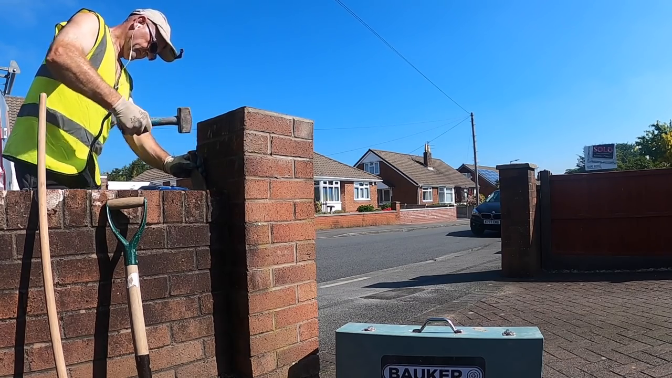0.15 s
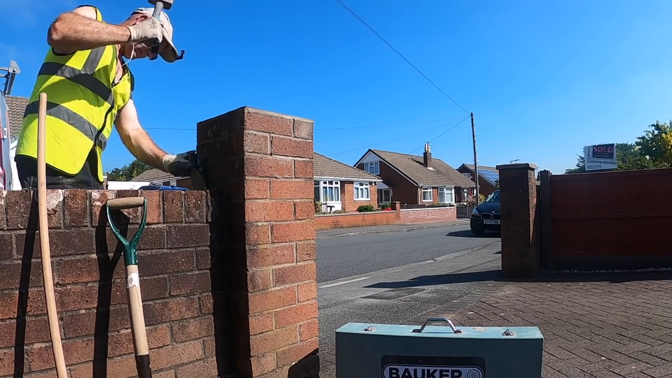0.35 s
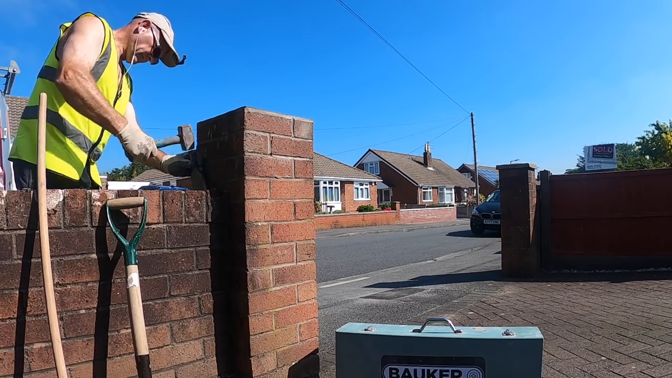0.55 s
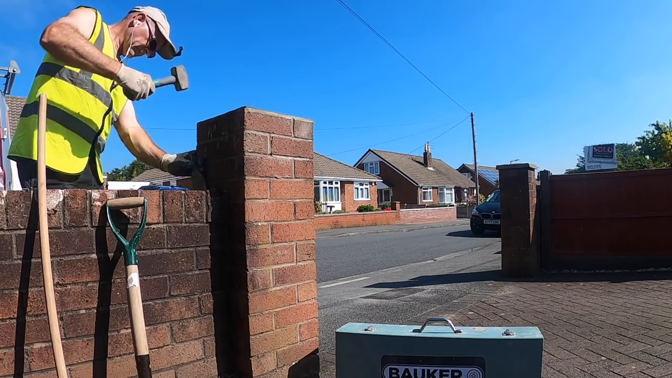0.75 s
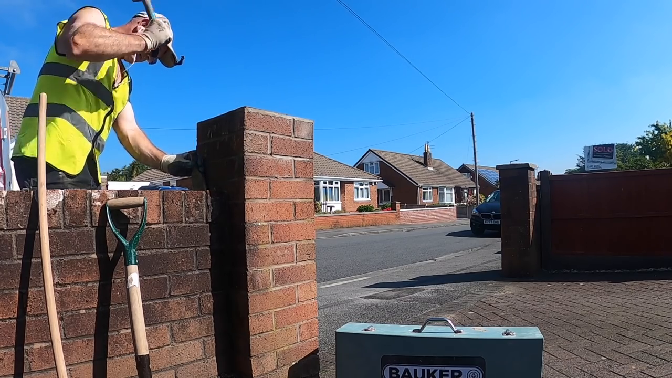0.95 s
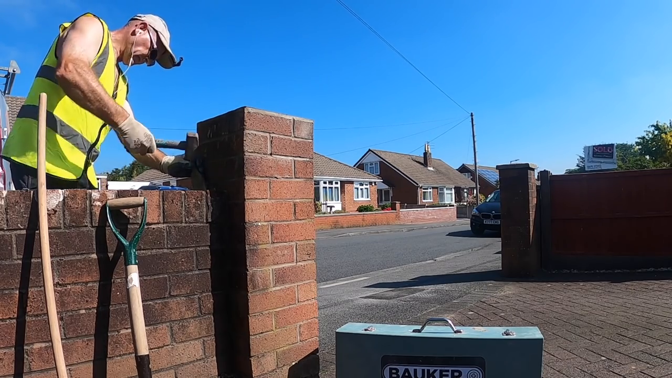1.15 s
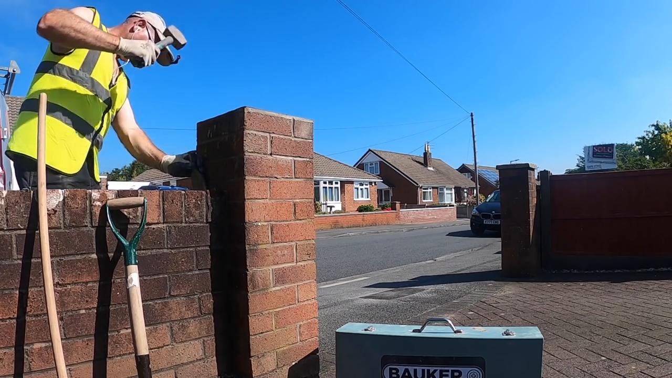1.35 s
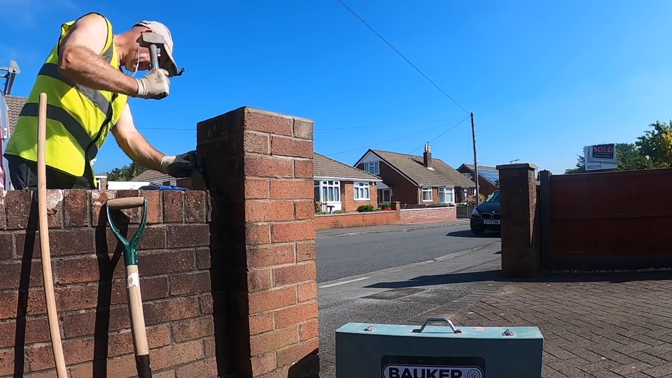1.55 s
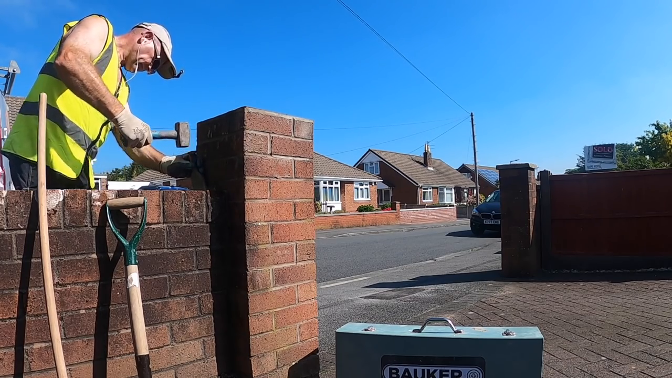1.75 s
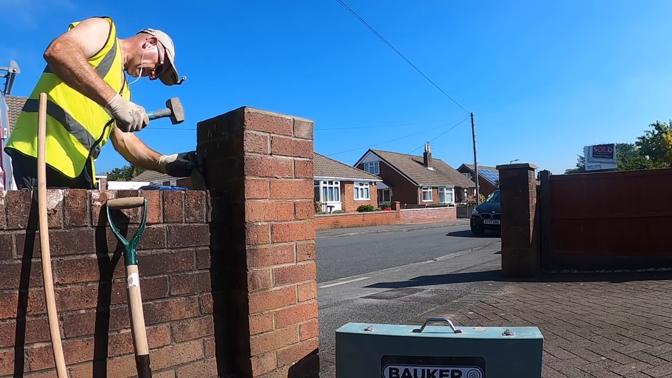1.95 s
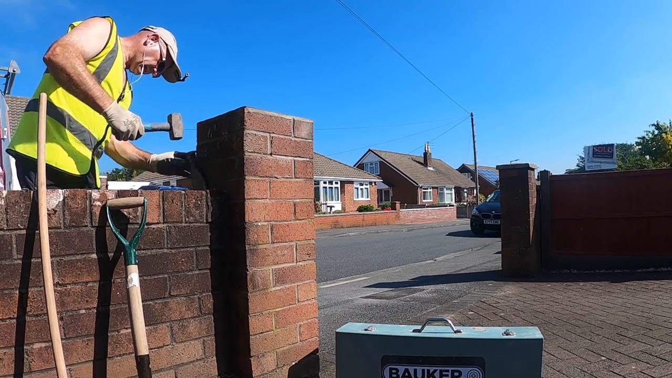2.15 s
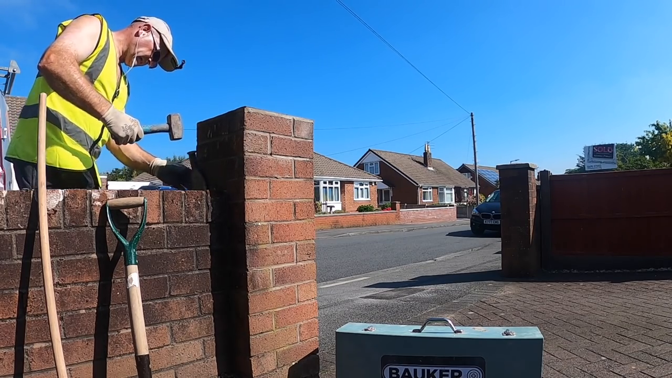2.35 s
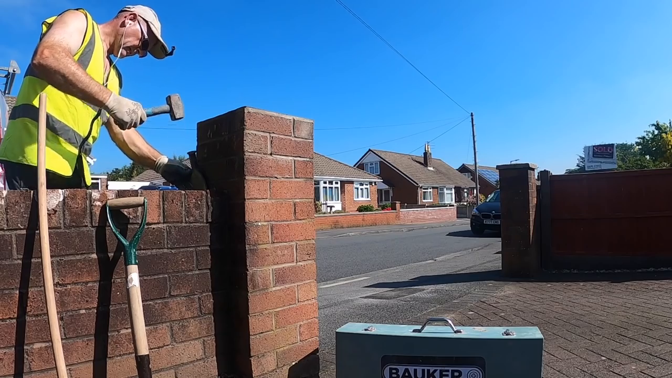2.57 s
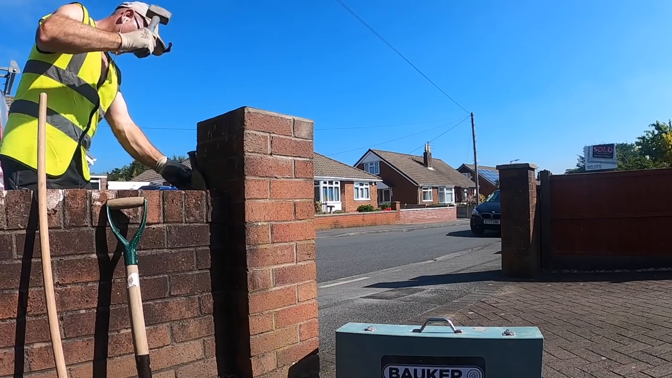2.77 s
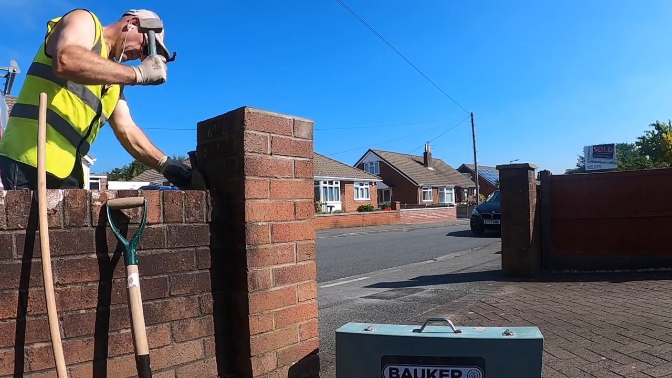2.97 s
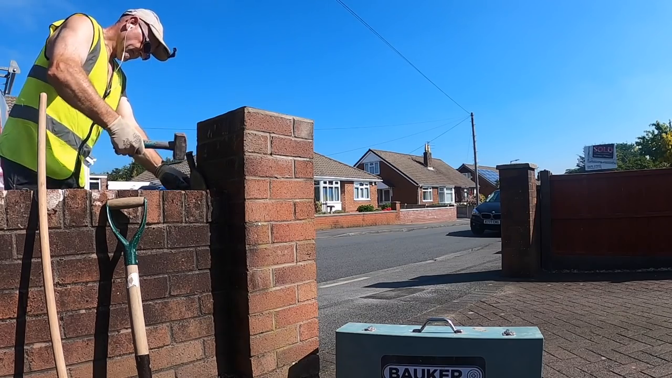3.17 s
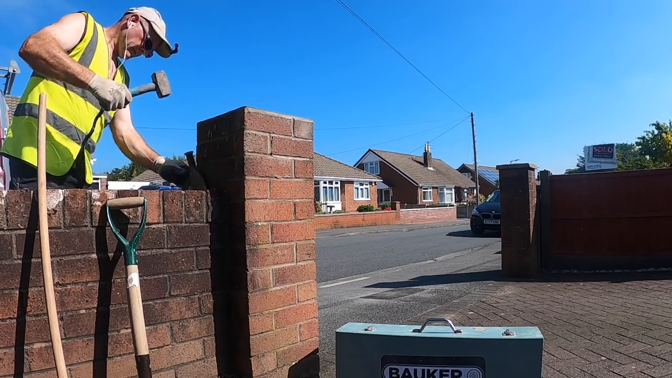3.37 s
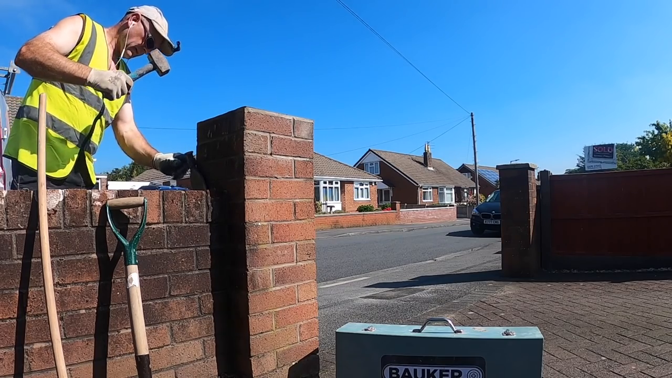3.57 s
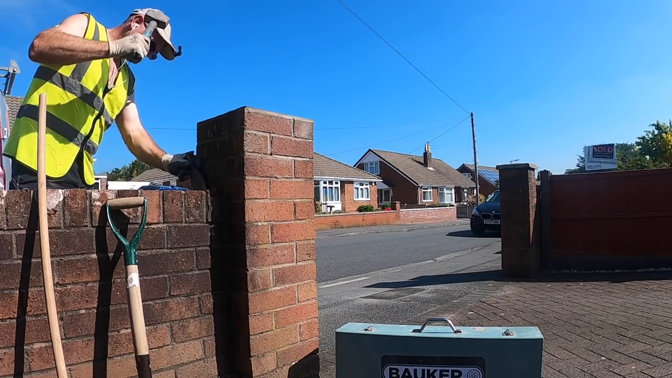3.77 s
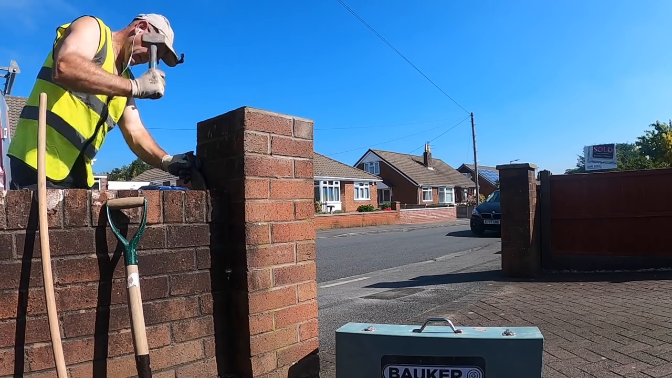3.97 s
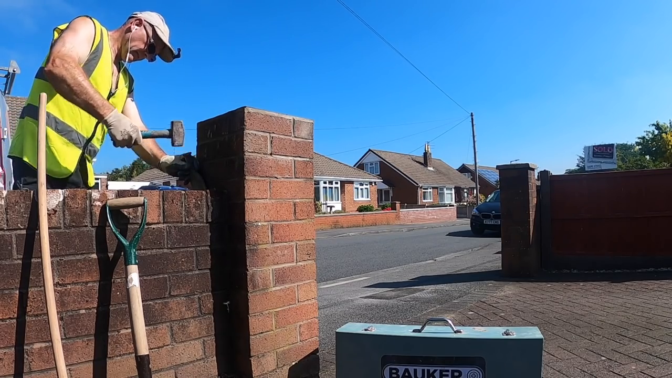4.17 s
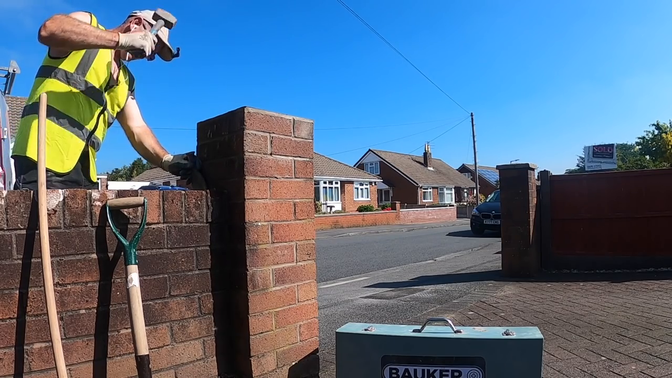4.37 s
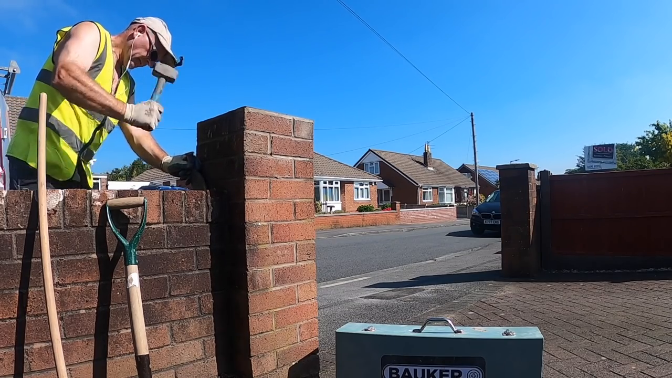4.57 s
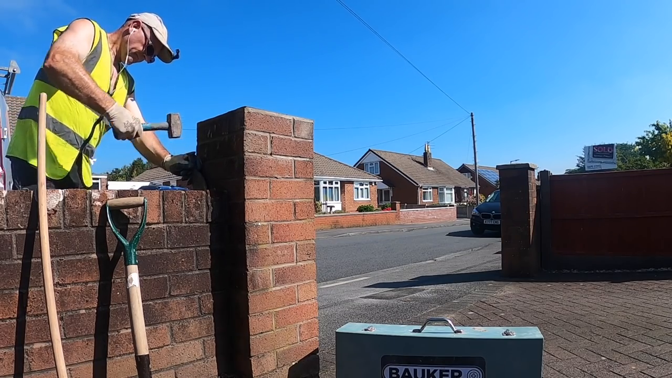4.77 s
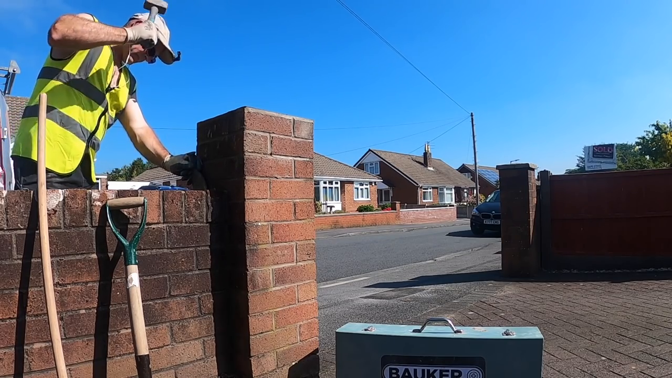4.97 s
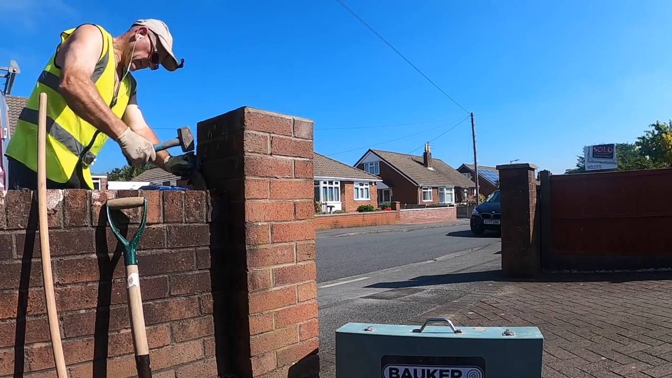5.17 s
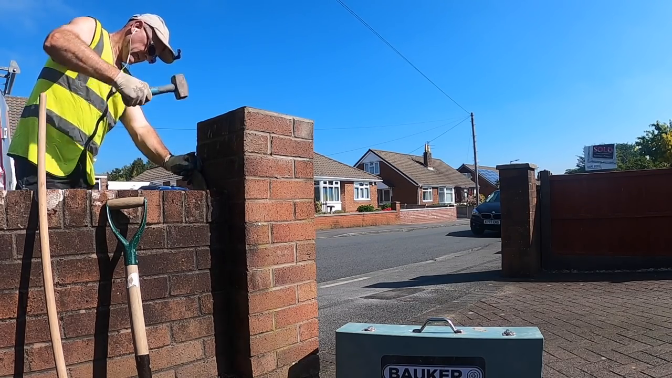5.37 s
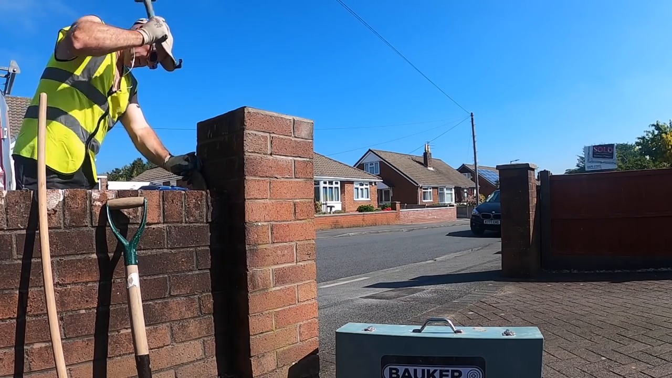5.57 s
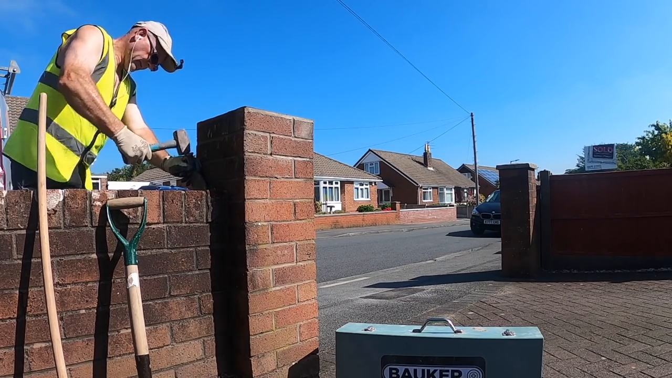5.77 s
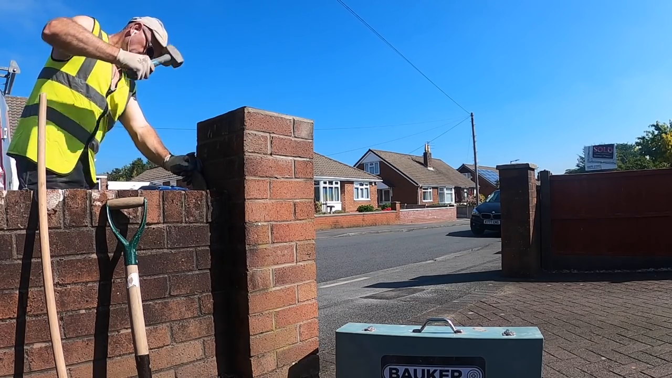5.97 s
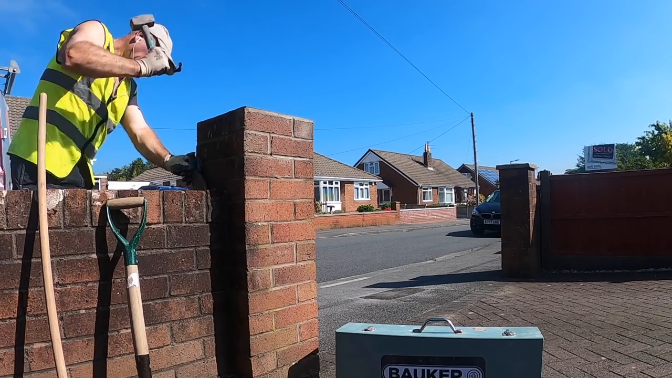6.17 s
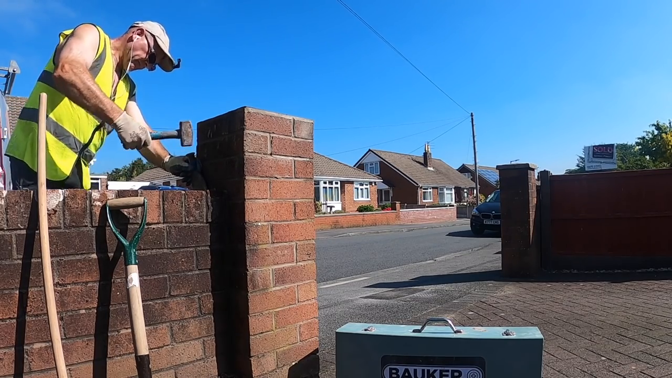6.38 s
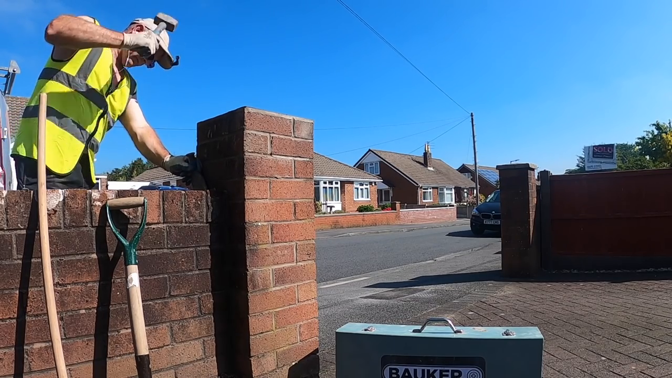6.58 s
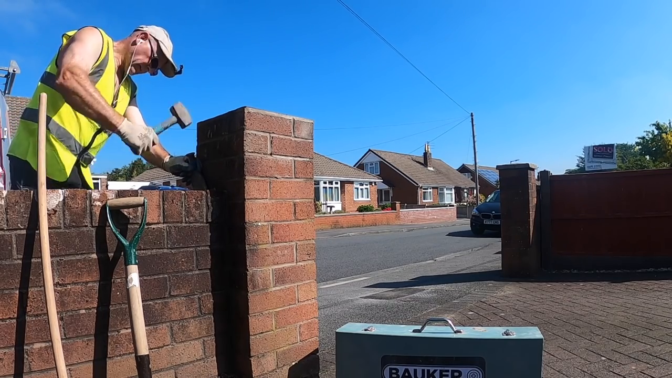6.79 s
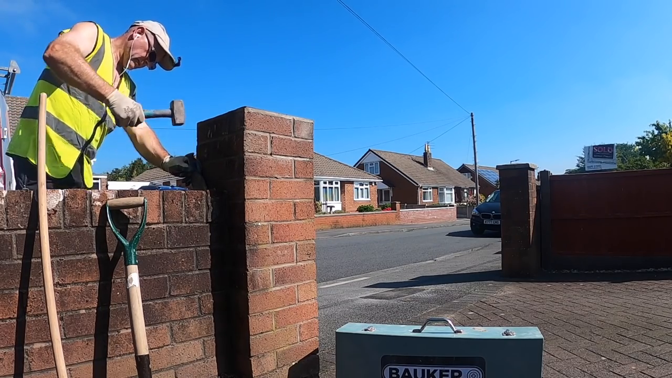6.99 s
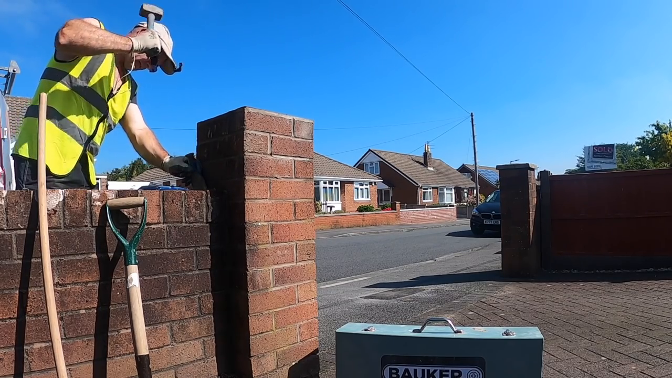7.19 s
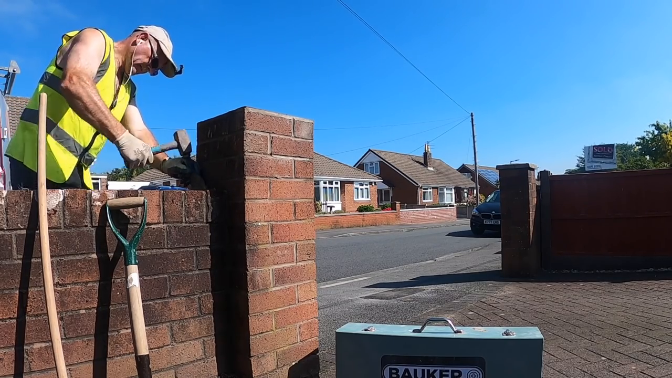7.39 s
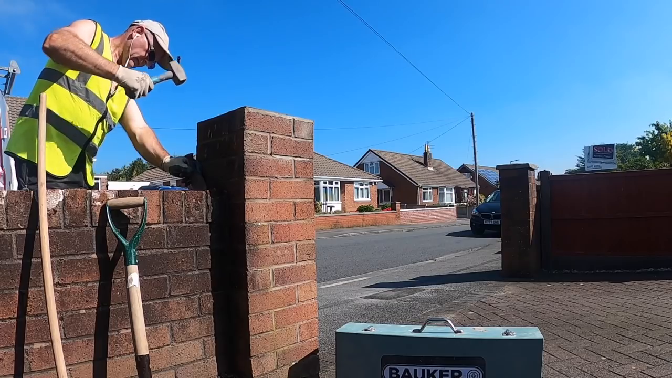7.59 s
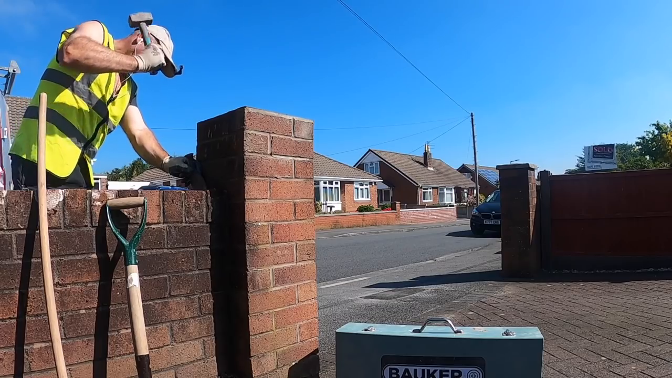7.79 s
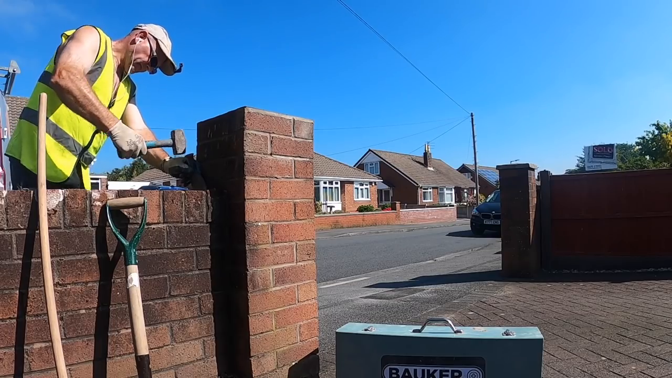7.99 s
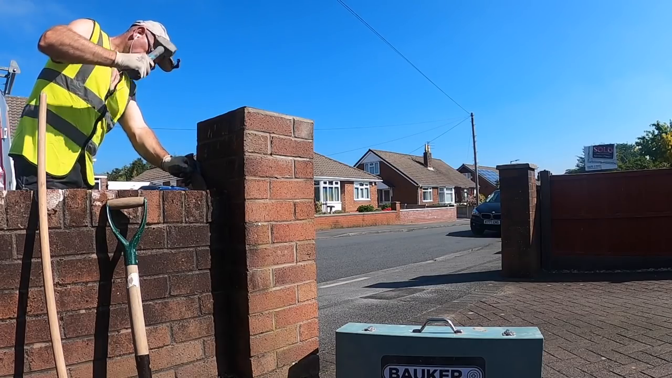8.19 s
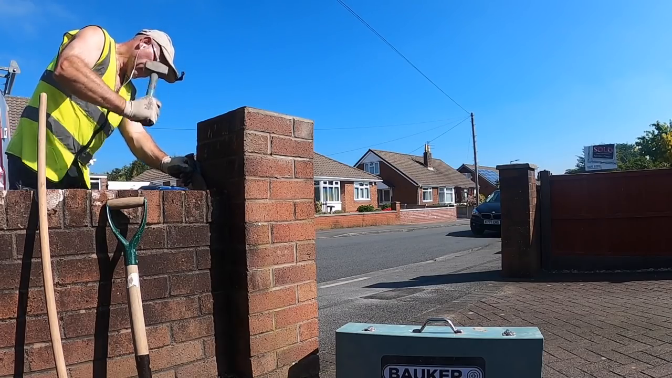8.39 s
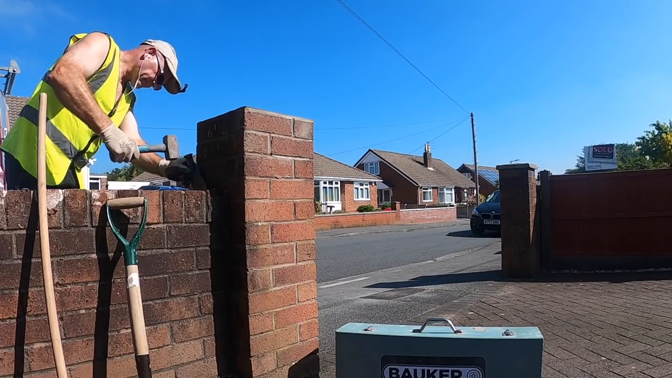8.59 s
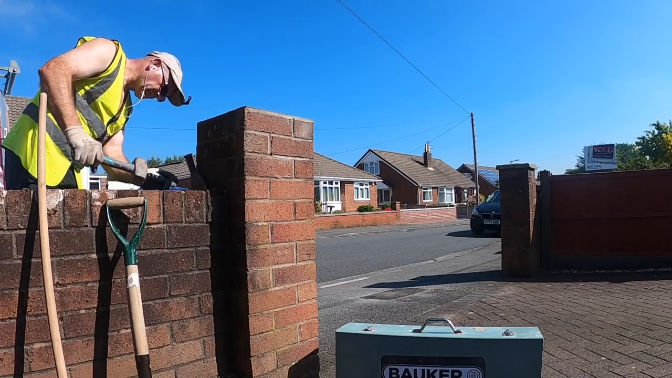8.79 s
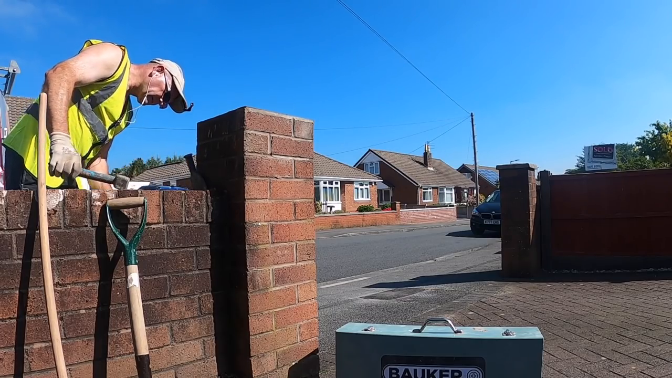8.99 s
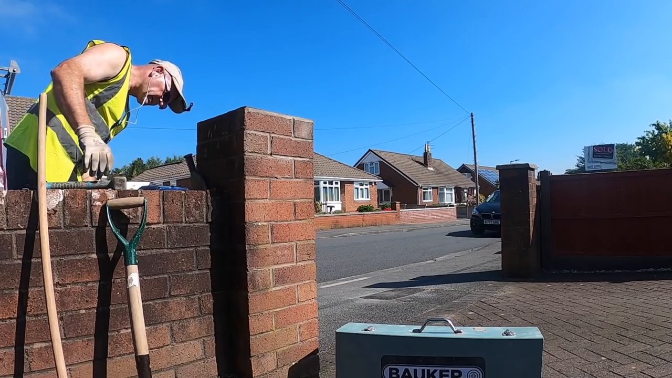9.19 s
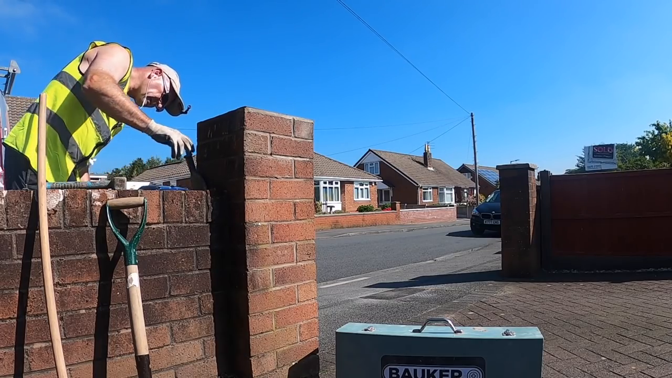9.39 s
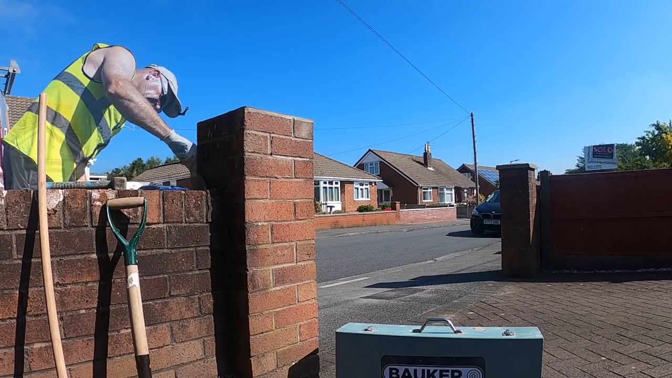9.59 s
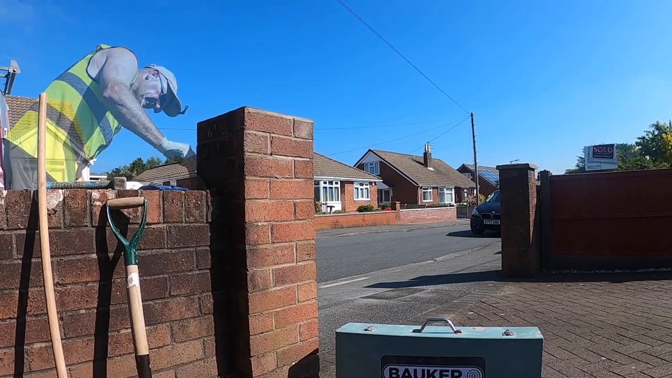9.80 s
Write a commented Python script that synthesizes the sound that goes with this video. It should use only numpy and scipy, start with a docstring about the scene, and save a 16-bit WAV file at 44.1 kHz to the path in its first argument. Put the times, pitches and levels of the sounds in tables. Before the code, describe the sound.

A club hammer cracks hard on a steel chisel in a brick pillar, fourteen sharp steady blows echoing off houses, then tools clatter down.

```python
"""A bird chirp over faint far traffic, then at once the first of fourteen blows of a club hammer on a steel
chisel in a brick pillar: filtered noise bursts with wall echoes, each after a stepped rise of bright noise.
Some blows rebound; between them crushed grains scrape in the joint. Near the end chips settle and the tools
knock down on the wall, with decaying sines. Wind rumbles low. Mono, hard-limited."""
import sys
import numpy as np
from scipy import signal
from scipy.fft import rfft, irfft
from scipy.io import wavfile
from scipy.ndimage import map_coordinates

SR = 44100
rng = np.random.default_rng(int(sys.argv[2]) if len(sys.argv) > 2 else 0)


def store_wav(level_fs):
    """Save 16-bit WAV to argv[1]."""
    pcm = np.round(np.clip(np.atleast_2d(level_fs), -1, 1) * 32767)
    wavfile.write(sys.argv[1], SR, pcm.T.astype(np.int16))


N = 434385


def amp(db):
    """Decibels to gain."""
    return 10 ** (np.asarray(db) / 20)


def unit(x):
    """Scaled to rms 1."""
    return x / np.sqrt(np.mean(x ** 2) + 1e-20)


def shape(points, f_hz):
    """Gain interpolated through (f/Hz, level/dB) points on a log frequency axis."""
    knots_hz, level_db = np.transpose(points)
    return amp(np.interp(np.log(f_hz + 1), np.log(knots_hz), level_db))


def resonance(f_hz, centre_hz, width_hz):
    """Gain of one damped mode."""
    return 1 / np.sqrt(1 + ((f_hz ** 2 - centre_hz ** 2) / (f_hz * width_hz + 1e-6)) ** 2)


def colour(x, gain):
    """x through a minimum-phase filter of unit energy with the given gain of frequency."""
    size = 8192
    cepstrum = irfft(np.log(np.maximum(gain(np.fft.rfftfreq(size, 1 / SR)), 1e-6)))
    # fold the cepstrum to make the pulse causal
    cepstrum[1:size // 2] *= 2
    cepstrum[size // 2 + 1:] = 0
    pulse = irfft(np.exp(rfft(cepstrum)))
    return signal.fftconvolve(x, pulse / np.linalg.norm(pulse))[:len(x)]


def fade(t_s, t60_s):
    """Exponential decay, 60 dB in t60_s."""
    return np.exp(-np.log(1000) * t_s / t60_s)


def wobble(rate_hz):
    """A smooth random curve, rate_hz knots a second."""
    knots = rng.standard_normal(int(N * rate_hz / SR) + 4)
    return map_coordinates(knots, [np.arange(N) * rate_hz / SR])


def swell(peak_s, length_s):
    """A smooth rise and fall of height 1 around peak_s."""
    return np.exp(-((np.arange(N) / SR - peak_s) / length_s) ** 2)


def add(track, s, sound):
    """Mix a sound in at time s."""
    start = max(round(s * SR), 0)
    track[start:start + len(sound)] += sound[:max(N - start, 0)]


# wind rumble spectrum: f/Hz, relative level/dB
RUMBLE_SPECTRUM = [(15, -19.5), (35, -13.5), (55, 6), (90, 4), (200, -15), (800, -68)]
CALM_DB, GUST_DB, GUST_S, GUST_LENGTH_S = -61.5, 11, 2.62, .45


def breeze():
    """Light air rumbles on the microphone, with one gust: low noise of wavering level."""
    level_db = CALM_DB + GUST_DB * swell(GUST_S, GUST_LENGTH_S)
    rumble = unit(colour(rng.standard_normal(N), lambda f_hz: shape(RUMBLE_SPECTRUM, f_hz)))
    return amp(level_db + 2.7 * wobble(4.4)) * rumble


# far-road spectrum: f/Hz, relative level/dB
TRAFFIC_SPECTRUM = [(20, -44), (50, -19), (130, -10), (190, -3), (290, -14), (450, -15), (700, -15),
                    (1050, -13.5), (1700, -18.5), (3000, -27), (5300, -30), (7500, -43.5), (11000, -56),
                    (14000, -70.5)]
# far vehicles: loudest t/s, length/s, swell above the wash/dB
VEHICLE_PASSES = [(0.203, 0.95, 2), (3.4, 1, 6.5), (9.85, 1, 4.5)]
TRAFFIC_DB = -49


def traffic():
    """A slowly wavering noise wash of far roads that swells as vehicles pass."""
    level_db = TRAFFIC_DB + sum(db * swell(s, length_s) for s, length_s, db in VEHICLE_PASSES)
    wash = unit(colour(rng.standard_normal(N), lambda f_hz: shape(TRAFFIC_SPECTRUM, f_hz)))
    return amp(level_db + 0.46 * wobble(5.1)) * wash


# bird chirps: t/s, start f/Hz, level/dB
BIRD_CHIRPS = [(.015, 6260, -42), (0.594, 4880, -44), (1.565, 4800, -41), (2.685, 4500, -44),
               (2.995, 5140, -50), (3.65, 5100, -51), (3.86, 3380, -47), (3.97, 5300, -58),
               (4.605, 5100, -51)]
BIRD_HOME_HZ, BIRD_MAX_SLUR_HZ = 5850, 970  # chirps slide towards home, by at most the slur
SYRINX_RATIO, SYRINX_SHARE = 1.19, .7  # second voice: pitch ratio, amplitude ratio


def birds(length_s=.035, waver_hz=90):
    """Short slurred chirps; the two sides of the syrinx sing a pitch each."""
    out = np.zeros(N)
    u = np.linspace(0, 1, round(length_s * SR))
    for s, start_hz, db in BIRD_CHIRPS:
        slur_hz = np.clip(BIRD_HOME_HZ - start_hz, -BIRD_MAX_SLUR_HZ, BIRD_MAX_SLUR_HZ)
        waver = map_coordinates(rng.standard_normal(21), [20 * u])
        phase = 2 * np.pi * np.cumsum(start_hz + slur_hz * u + waver_hz * waver) / SR
        voices = np.sin(phase) + SYRINX_SHARE * np.sin(SYRINX_RATIO * phase)
        add(out, s, amp(db) * np.sin(np.pi * u) * voices)
    return out


# the diffuse answer sags slowly while the house fronts keep returning it, then dies away
STREET_DB, STREET_SAG_DB_PER_S, STREET_HOLD_S, STREET_FALL_DB_PER_S = -27.5, 24.5, 0.2, 85
YARD_DB, YARD_T60_S = -23, .14  # first scatter off the paving
FAR_DB, FAR_T60_S = -57, 3.5  # faint wash from further down the street


def street(t_s):
    """Gain of the diffuse answer at age t_s: powers of yard, house fronts and far street add."""
    sag_db = STREET_SAG_DB_PER_S * np.minimum(t_s, STREET_HOLD_S)
    fall_db = STREET_FALL_DB_PER_S * np.maximum(t_s - STREET_HOLD_S, 0)
    fronts = amp(STREET_DB - sag_db - fall_db)
    yard = amp(YARD_DB) * fade(t_s, YARD_T60_S)
    far = amp(FAR_DB) * fade(t_s, FAR_T60_S)
    return np.sqrt(fronts ** 2 + yard ** 2 + far ** 2)


# gate, garden walls and house fronts across the street: delay t/s, level/dB before street_db
WALL_ECHOES = [(.022, -20.5), (0.03, -18.5), (.06, -21.5), (.084, -28), (0.123, -27), (.163, -26.5),
               (.2215, -31), (0.24, -31.5), (.278, -31.5)]
ECHO_T60_S, ECHO_SMEAR = .011, .025  # smear: added t60 per delay, s/s


def impact(t60_s, street_db, swing_db=2, lumpy_db=2):
    """A noise burst, sharp wall echoes and the street's tail, which the air dulls as it travels."""
    t_s = np.arange(SR) / SR
    noise = rng.standard_normal(SR)
    swing = swing_db * rng.standard_normal(len(WALL_ECHOES))  # echo levels vary at random each time
    echoes = np.zeros(SR)
    for (delay_s, db), vary_db in zip(WALL_ECHOES, swing):
        snap = noise * fade(t_s, ECHO_T60_S + ECHO_SMEAR * delay_s)  # far echoes blur
        echoes += amp(db + vary_db) * np.interp(t_s - delay_s, t_s, snap, left=0)
    # echoes crowd and smooth out with time
    lumps = map_coordinates(rng.standard_normal(1024), [t_s * 380])
    diffuse = rng.standard_normal(SR) * amp(lumpy_db * lumps * fade(t_s, 1.7))
    f_hz, age_s, z = signal.stft(diffuse * street(t_s) + echoes, SR, nperseg=256)
    air_db = -24 * age_s * (f_hz[:, None] / 10000) ** 2
    tail = signal.istft(z * amp(air_db), SR, nperseg=256)[1][:SR]
    return noise * fade(t_s, t60_s) + amp(street_db) * tail


# chisel dragging in the joint: start t/s, length/s, level at mid-stroke/dB
SCRAPE_STROKES = [(0.473, 0.097, -38.5), (1.059, 0.086, -41), (2.024, 0.19, -37), (2.147, 0.12, -39),
                  (2.77, 0.19, -37.5), (2.848, 0.29, -48.5), (3.695, 0.8, -51.5), (8.923, 0.25, -44.5),
                  (9.523, 0.47, -50.5)]
# crushed mortar spectrum: f/Hz, relative level/dB
GRIT_SPECTRUM = [(300, -24), (1000, 2.5), (1900, 7.5), (4000, 5.5), (5500, 0.5), (7500, -14),
                 (11000, -30.5), (16000, -49.5)]


def scraping():
    """Mortar grains crush in clumps under the dragged edge: sparse random impulses, filtered."""
    stroke = np.zeros(N)
    for s, length_s, db in SCRAPE_STROKES:
        add(stroke, s, amp(db) * np.hanning(round(length_s * SR)))
    hits = rng.random(N) < 3500 / SR  # 3500 grains/s on average
    grains = rng.standard_normal(N) * hits * amp(2.0 * wobble(90))
    return stroke * unit(colour(grains, lambda f_hz: shape(GRIT_SPECTRUM, f_hz)))


# modes of a steel tool set down on the wall: f/Hz, t60/s, relative level/dB
TOOL_MODES = [(1100, 0.052, 4), (2034, 0.049, 4), (2380, 0.047, -0.5), (2750, 0.044, -2.5),
              (3590, 0.032, -4.5), (4080, 0.027, -2.5), (5590, 0.044, -9)]
# its contacts: t/s, level/dB
TOOL_CONTACTS = [(9.205, -20.5), (9.237, -28.5)]


def tool_down(attack_s=0.00018):
    """A steel tool's modes ring briefly as it meets the wall and settles; the street carries the clink."""
    out, t_s = np.zeros(N), np.arange(SR) / SR
    for s, db in TOOL_CONTACTS:
        ring = np.zeros(SR)
        for f_hz, t60_s, mode_db in TOOL_MODES:
            phase = 2 * np.pi * f_hz * t_s + rng.uniform(0, np.pi)
            ring += amp(mode_db) * fade(t_s, t60_s) * np.sin(phase)
        ring *= (1 - np.exp(-t_s / attack_s)) ** 2
        scatter = unit(rng.standard_normal(SR) * fade(t_s, 0.25)) / np.sqrt(SR)  # unit energy
        clink = signal.fftconvolve(ring, scatter)[:SR]
        add(out, s, amp(db) * (ring + amp(-7) * clink))
    return out


# light knocks on the wall, with chips of rubble settling around 9 s: t/s, relative level/dB, pitch f/Hz
LIGHT_KNOCKS = [(8.954, -9, 2700), (8.963, -22, 895), (9.011, -18.5, 810), (9.04, -24, 480),
                (9.1, -11.5, 1130), (9.204, -11, 2026), (9.732, -27, 5260), (9.763, -26, 3880)]
# light knock spectrum: f/Hz, relative level/dB
TAP_SPECTRUM = [(80, -21), (350, 3), (1100, 1.5), (2300, -5.5), (3200, -11.5), (5600, -4), (8000, -25.5),
                (15000, -54)]
KNOCK_DB = -10.5  # offset on every knock


def knocks():
    """Light knocks on the wall and settling chips: impacts, each with one short resonance."""
    out = np.zeros(N)
    for s, db, pitch_hz in LIGHT_KNOCKS:
        def gain(f_hz):
            peak = amp(13.5) * resonance(f_hz, pitch_hz, .4 * pitch_hz) ** 2
            return shape(TAP_SPECTRUM, f_hz) * (1 + peak)
        add(out, s, amp(db + KNOCK_DB) * colour(impact(t60_s=0.087, street_db=-2.0), gain))
    return out


SLAP_FROM_S = 7.7  # only blows after this slap back
SLAP_DB, SLAP_STEP_DB = -8.5, -8  # first slap; second relative to it


def slaps():
    """The two farthest walls each return a thin, short tick of the last blows."""
    out, t_s = np.zeros(N), np.arange(SR // 10) / SR
    for s in [row[0] for row in HAMMER_BLOWS if row[0] > SLAP_FROM_S]:
        for k, (delay_s, _) in enumerate(WALL_ECHOES[-2:]):
            burst = rng.standard_normal(len(t_s)) * fade(t_s, 0.0078)
            tick = colour(burst, lambda f_hz: resonance(f_hz, 3400, 1170) ** 3)
            add(out, s + delay_s, amp(SLAP_DB + k * SLAP_STEP_DB) * tick)
    return out


# the pillar's dull body: f/Hz, relative level/dB
THUD_SPECTRUM = [(20, -51), (40, -25), (55, -1.5), (80, -14), (120, 1.5), (200, 3.5), (320, -1),
                 (450, -14.5), (900, -29.5), (3000, -57.5)]


def thud(pillar, change_db=-7):
    """The pillar's low answer: mostly the same noise at every blow, with a two-stage decay."""
    t_s = np.arange(SR) / SR
    decay = fade(t_s, 0.075) + amp(-8) * fade(t_s, 0.45)
    push = (pillar + amp(change_db) * rng.standard_normal(SR)) * decay
    return colour(push, lambda f_hz: shape(THUD_SPECTRUM, f_hz))


# chisel modes: multiple of its pitch, width/Hz before squaring, level/dB, share of the gloved
# hand's damping (0-1, scales chisel_db)
CHISEL_MODES = [(.185, 380, -16.5, 0.8), (1, 260, -1.5, 1), (1.909, 270, -18, 0.6),
                (2.74, 250.4, -30.5, 0.4)]
# steel on masonry: f/Hz, relative level/dB
CRACK_SPECTRUM = [(40, -25), (200, -13.5), (550, -13), (900, -12.5), (1250, -9.5), (1700, -2), (2600, -1.5),
                  (4000, 0), (4700, -5.5), (5800, -8), (7200, -20), (9000, -26.5), (12000, -43.5),
                  (16000, -56.5)]
# the brick's own ring: f/Hz, width/Hz before squaring
BRICK_MODE = (1800, 560)
CLANK_WIDTH_HZ = 560  # before squaring


def clank(brick_db, clank_hz, clank_db, chisel_hz, chisel_db, t60_s, street_db, ripple_db=2, ripple_hz=170):
    """Steel on steel on brick: a broad crack and resonances that shift with the chisel's seat and grip."""
    knots = rng.standard_normal(1024)

    def gain(f_hz):
        bar = sum(amp(db + share * chisel_db) * resonance(f_hz, k * chisel_hz, width_hz) ** 2
                  for k, width_hz, db, share in CHISEL_MODES)
        seat = amp(clank_db) * resonance(f_hz, clank_hz, CLANK_WIDTH_HZ) ** 2
        brick = amp(brick_db) * resonance(f_hz, *BRICK_MODE) ** 2
        # random spectral ripple, drawn afresh for each clank
        ripple = amp(ripple_db * map_coordinates(knots, [f_hz / ripple_hz]))
        return shape(CRACK_SPECTRUM, f_hz) * ripple + seat + brick + bar
    return colour(impact(t60_s, street_db), gain)


# clanks close to a blow, two about 11 ms ahead of one, the others later as rebounds: t/s, level/dB
CLOSE_CLANKS = [(3.1323, -5), (4.1305, -9), (4.7526, 1), (5.3105, -4.5), (5.8549, -6), (8.0533, -12),
                (8.6068, -10.5)]


def close_clanks():
    """Light clanks close to a blow, most of them rebounds, with a freer chisel ring than the blows."""
    out = np.zeros(N)
    for s, db in CLOSE_CLANKS:
        contact = clank(brick_db=-12, clank_hz=4200, clank_db=7, chisel_hz=5204, chisel_db=14.0,
                        t60_s=0.039, street_db=-24.5)
        add(out, s, amp(db) * contact)
    return out


def stepped_rise(x, step_s=.0104, fall_db=-11.0, blur_db=-9, count=4):
    """A stepped burst of bright noise cut from the blow: repeats step_s apart, each louder."""
    size = round(step_s * SR)
    high_pass = signal.butter(1, 1200, "high", fs=SR, output="sos")
    bright = signal.sosfilt(high_pass, x[:8 * size])
    step = unit(bright[:size]) + amp(blur_db) * unit(bright[-size:])  # a sharp head over an even rasp
    return np.concatenate([amp(fall_db * k) * step for k in reversed(range(count))])


# hammer blows: t/s, strength level/dB, clank f/Hz, clank level/dB, chisel f/Hz, chisel level/dB
HAMMER_BLOWS = [(0.1033, -0.5, 3450, -5, 5180, -1), (0.6422, -1.5, 2310, -2, 5170, -3),
                (1.1618, -1.5, 3730, -2, 5090, 2), (1.7137, -2, 3510, 5, 5080, 6.5),
                (3.1436, 0, 2730, 3, 5100, 3), (4.1411, 0.5, 2790, 7, 5013, 17.5),
                (4.7079, -1, 2075, -9, 5220, 0), (5.2625, -1, 2650, -9, 5080, 0.5),
                (5.805, -1, 3400, -17.5, 5220, -5), (6.357, -0.5, 2650, 2.5, 5070, -4.5),
                (6.9018, 0, 3390, -8.5, 5090, -5), (7.4503, -1, 3236, -6, 5280, -4),
                (7.995, -0.5, 3280, 0.5, 5290, -6), (8.5386, -1.5, 3550, 1.5, 5270, -6.5)]
BLOW_DB, RISE_DB = 10.5, -16  # a full blow; the stepped burst just before it
# the tighter the chisel sits, the higher its clank and the more the brick rings with it
BRICK_DB, TIGHT_HZ, BRICK_DB_PER_OCTAVE = -2, 3740, 45.5
# the pillar thuds less once the mortar cracks and the brick works loose
THUD_DB, LOOSE_FROM_S, THUD_LOSS_DB_PER_S = -17, 5.2, 2.8


def hammering():
    """Each blow clanks the chisel and thuds through the pillar, just after a stepped burst of noise."""
    out, pillar = np.zeros(N), rng.standard_normal(SR)
    for s, db, clank_hz, clank_db, chisel_hz, chisel_db in HAMMER_BLOWS:
        brick_db = clank_db + BRICK_DB + BRICK_DB_PER_OCTAVE * np.log2(clank_hz / TIGHT_HZ)
        thud_db = THUD_DB - THUD_LOSS_DB_PER_S * max(s - LOOSE_FROM_S, 0)
        steel = clank(brick_db, clank_hz, clank_db, chisel_hz, chisel_db, t60_s=.017, street_db=-2.0)
        blow = amp(db + BLOW_DB) * steel
        rise = amp(RISE_DB) * stepped_rise(blow)
        add(out, s - len(rise) / SR, rise)
        add(out, s, blow + amp(thud_db) * thud(pillar))
    return out


def scene():
    """Everything reaches one microphone, on both channels."""
    background = breeze() + traffic() + birds()
    handling = scraping() + tool_down() + knocks()
    mono = background + handling + slaps() + close_clanks() + hammering()
    return np.array([mono, mono])


TOP_HZ = 16100


def record(dry):
    """The near microphone's input overloads at full scale; a low-pass then sets the band limit."""
    low_pass = signal.firwin(161, TOP_HZ, fs=SR, window="blackman")
    return signal.fftconvolve(np.clip(dry, -1, 1), low_pass[None], mode="same", axes=1)


dry = scene()
out = record(dry)
store_wav(out)
```